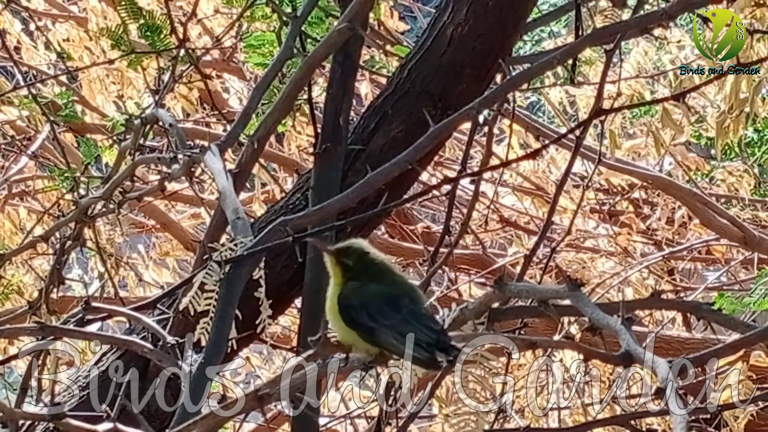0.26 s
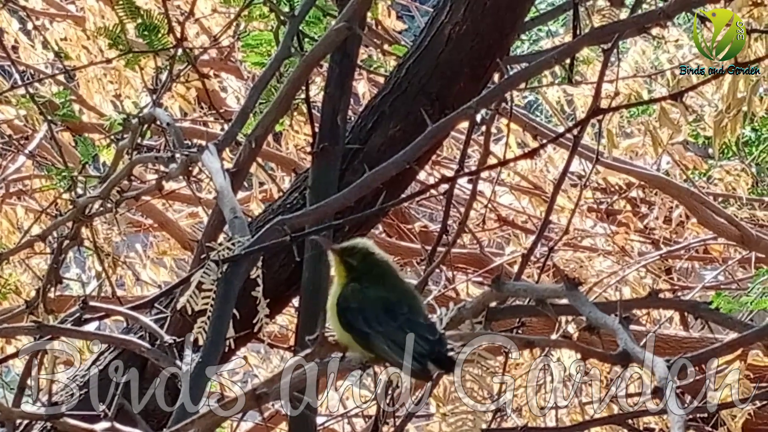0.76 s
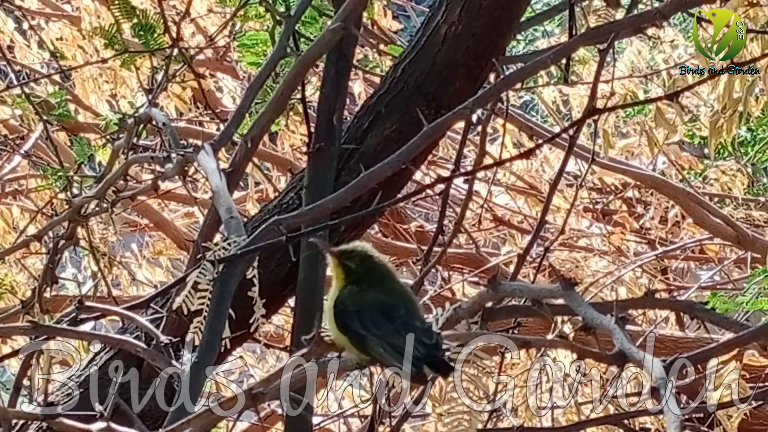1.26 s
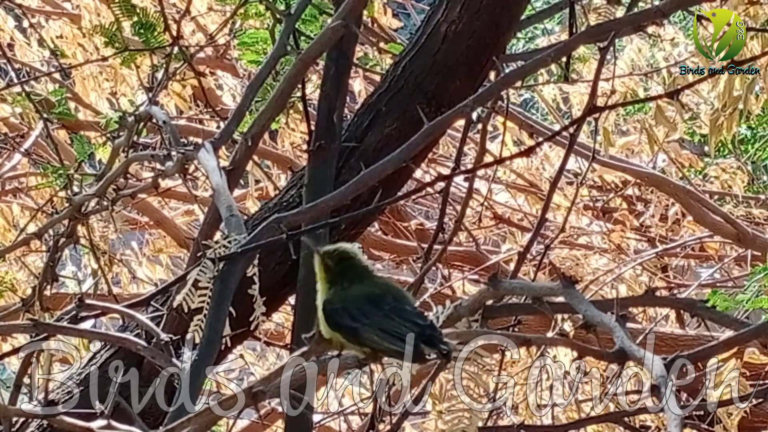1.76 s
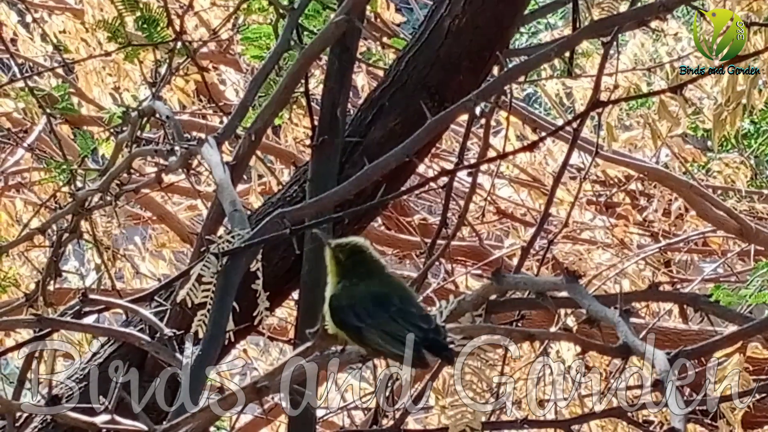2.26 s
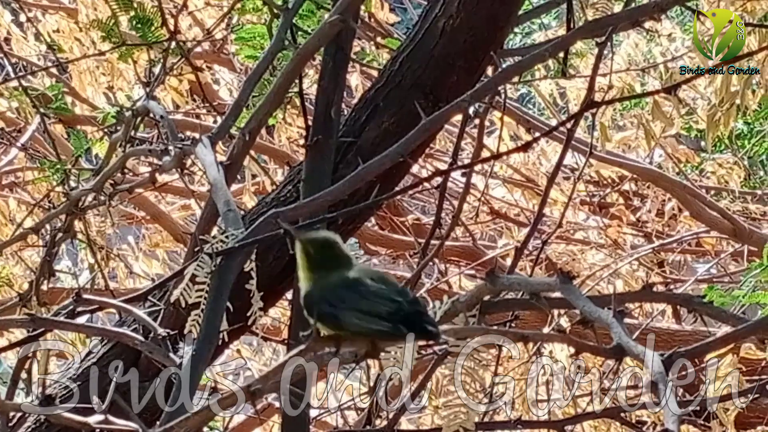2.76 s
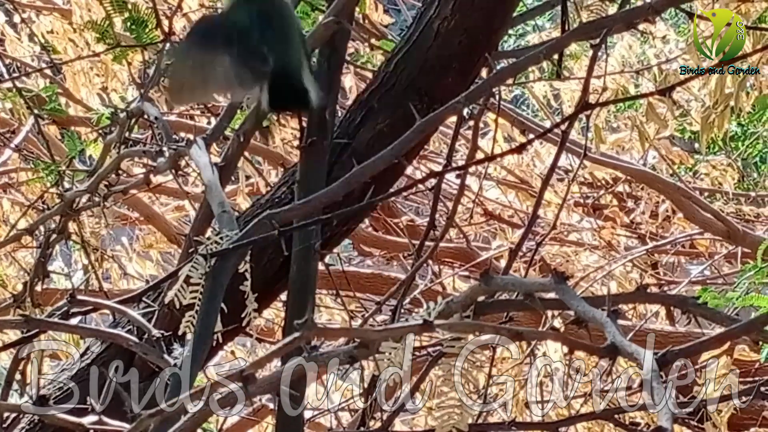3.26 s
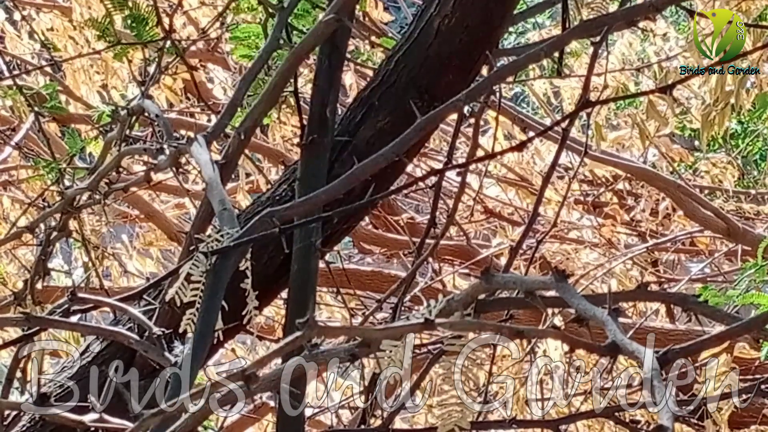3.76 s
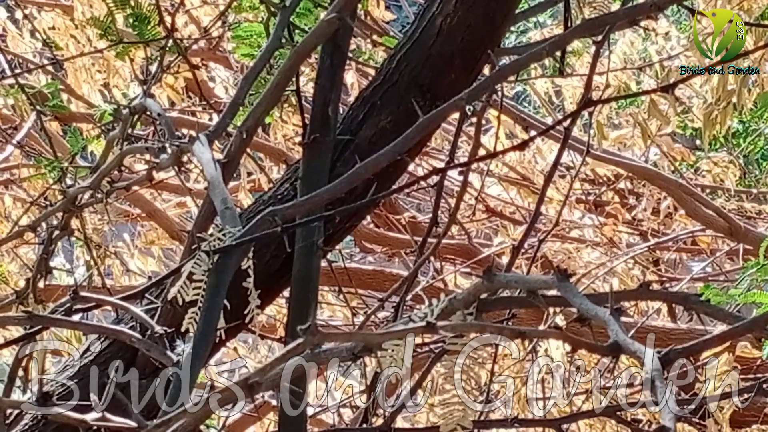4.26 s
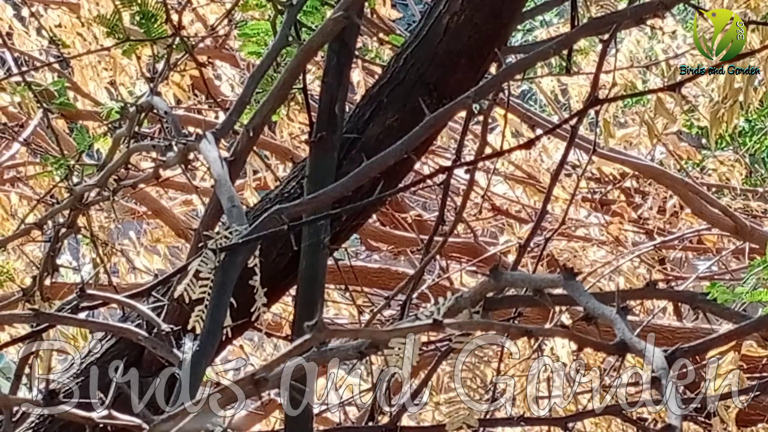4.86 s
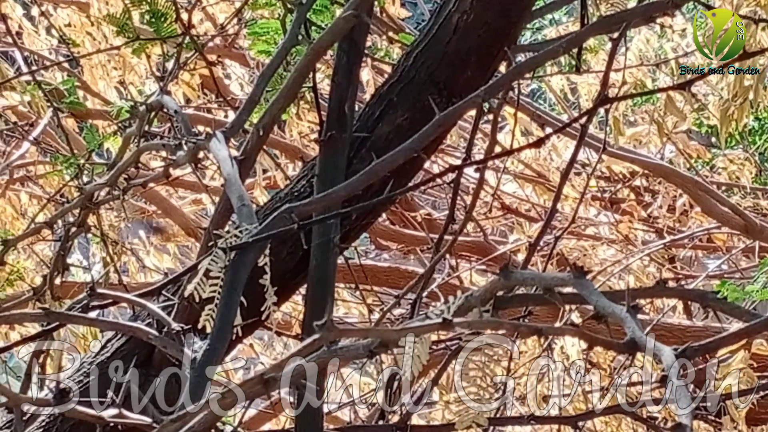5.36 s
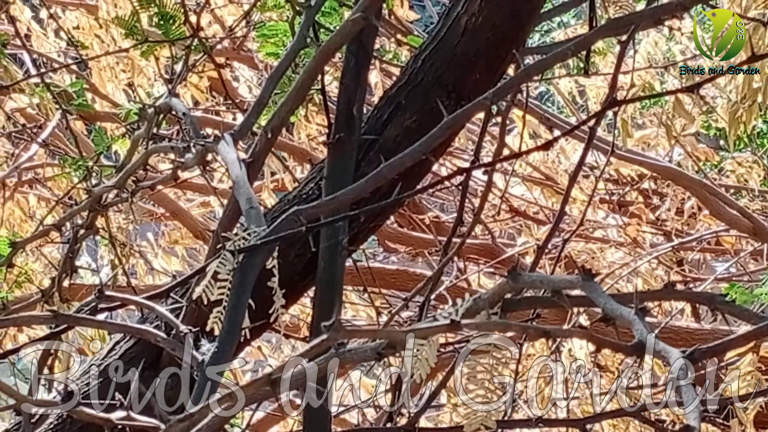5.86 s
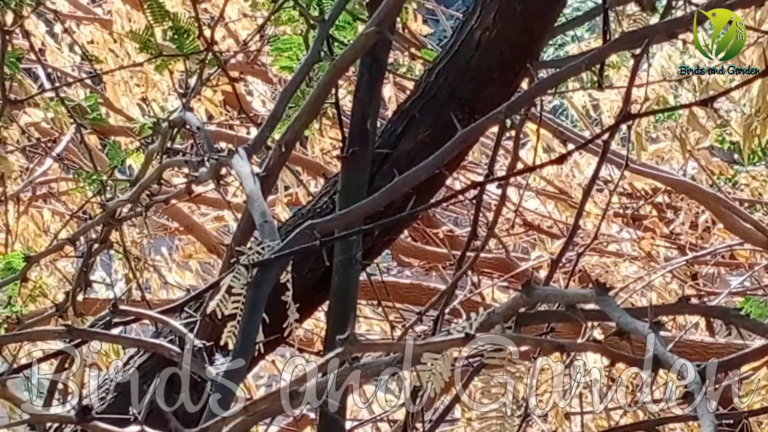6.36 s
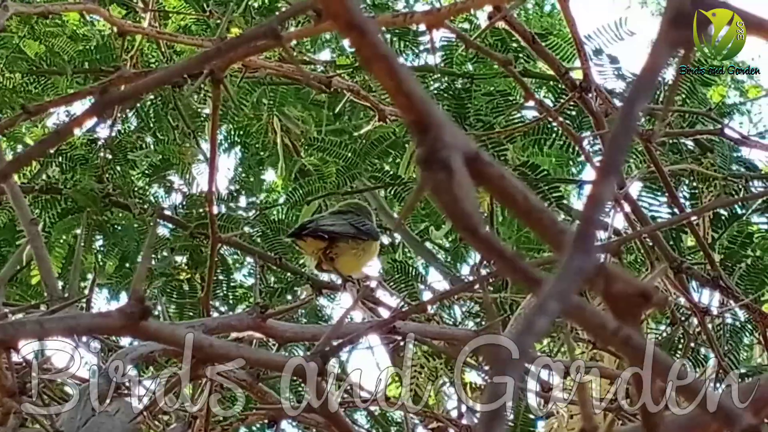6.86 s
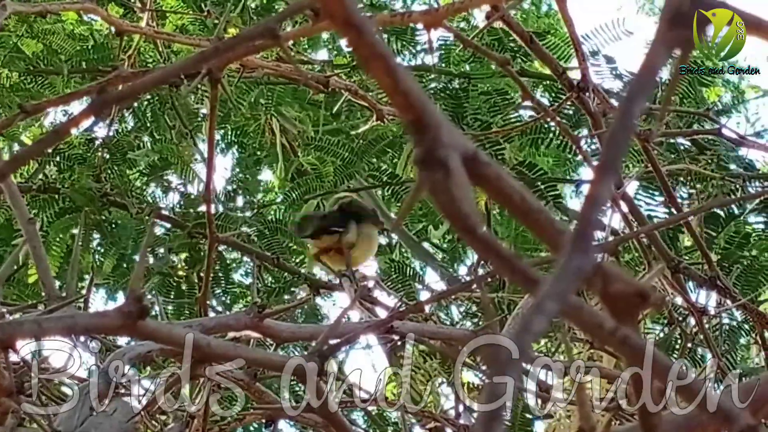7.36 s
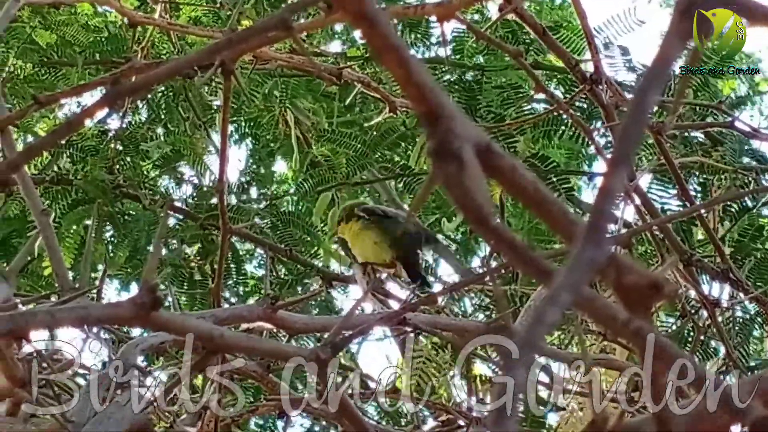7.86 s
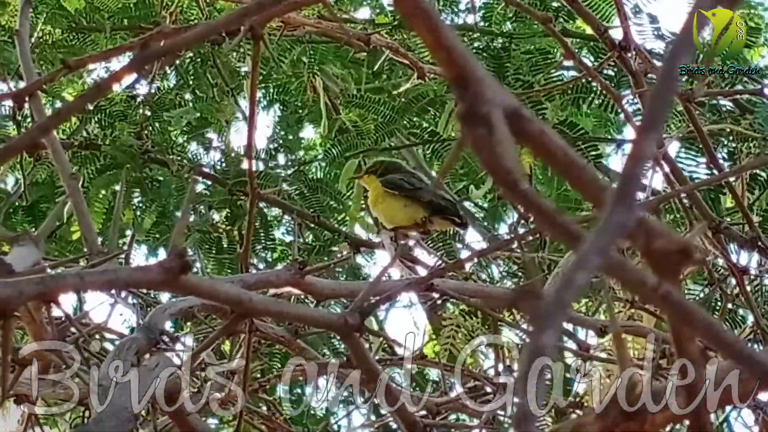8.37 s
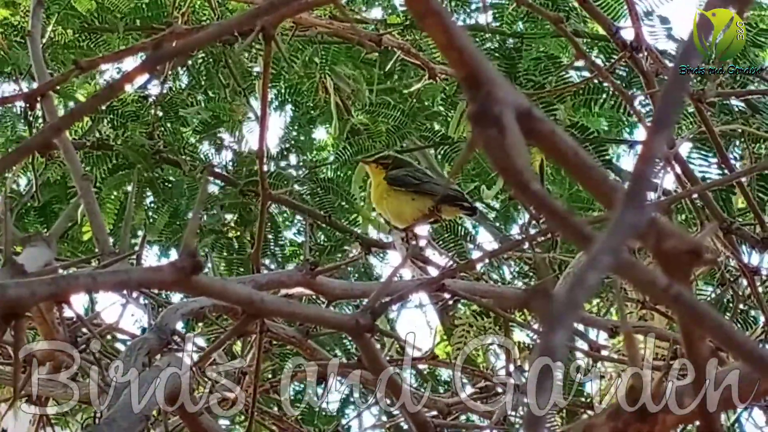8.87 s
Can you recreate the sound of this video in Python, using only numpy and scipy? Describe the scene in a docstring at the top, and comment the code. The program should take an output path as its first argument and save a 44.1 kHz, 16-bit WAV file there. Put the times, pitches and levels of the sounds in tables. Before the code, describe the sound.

Bright, piercing upswept bird calls about twice a second, soft wingbeats partway, other birds faint behind a low outdoor rumble, sound briefly cutting out.

```python
"""A sunbird in a thorn tree close to the microphone calls seventeen times: a rasp settles into a rising whistle.
From the start other birds twitter further away, as thin arched whistles over a low outdoor rumble and rush.
Between 2.4 and 3.7 s the sunbird flutters in puffs of noise and brushes the foliage; near 7 s all sound
drops out for 0.3 s; near 7.8 s it shuffles among the leaves. Faint echoes return; the sound is nearly mono."""
import sys
import numpy as np
from scipy import signal
from scipy.fft import rfft, irfft, next_fast_len
from scipy.io import wavfile
from scipy.ndimage import uniform_filter1d, minimum_filter1d, map_coordinates

SR = 44100
rng = np.random.default_rng(int(sys.argv[2]) if len(sys.argv) > 2 else 0)


def wrap_up_sound(samples):
    """Save the sound to the file named by the first command line argument, as 16-bit audio."""
    columns = np.atleast_2d(samples).T
    # keep every value between -1 and 1, then stretch to whole-number steps
    tamed = np.clip(columns, -1, 1)
    steps = np.round(tamed * 32767).astype(np.int16)
    wavfile.write(sys.argv[1], SR, steps)


N = 402191
TIME = np.arange(N) / SR
TOP_HZ = 15700  # upper limit of the whole sound
ATTACK_S, RELEASE_S = 0.009, 0.015  # fades of the whistle

# colour of the sunbird's rasp and breath: columns f/Hz, level/dB
RASP_COLOUR = [(1000, -53.5), (2000, -21.5), (2900, -21.5), (3400, -17), (4000, 1), (4900, 1), (5800, -3),
               (7000, -15.5), (9000, -27.5), (11000, -38), (14500, -41), (16000, -45.5)]
# colour of the outdoor rumble: columns f/Hz, level/dB per Hz
AIR_COLOUR = [(20, -35.5), (38, -14), (60, -3), (140, 0.5), (240, -2.5), (310, -9), (430, -11), (680, -19),
              (1100, -21.5), (2200, -26), (5000, -37.5), (7000, -38.5), (11000, -45.5), (15500, -53)]
AIR_DB = -42.5  # level of the rumble


def undb(db):
    """Decibels to gain."""
    return 10 ** (np.asarray(db) / 20)


def unit(x):
    """Scale to rms 1."""
    return x / np.sqrt(np.mean(x ** 2))


def gain_at(hz, points):
    """Gain of a (Hz, dB) spectrum at the given frequencies."""
    f, db = np.transpose(points)
    return undb(np.interp(np.log(hz + 1), np.log(f), db))


def noise(points, size):
    """Noise of rms 1 with a (Hz, dB) spectrum."""
    n = next_fast_len(size)
    spectrum = rfft(rng.standard_normal(n)) * gain_at(np.fft.rfftfreq(n, 1 / SR), points)
    return unit(irfft(spectrum, n)[:size])


def walk(rate, size):
    """Smooth random wander around 0, rate turns a second."""
    k = max(int(SR / rate), 1)
    steps = np.repeat(rng.standard_normal(size // k + 1), k)
    return 2.52 * uniform_filter1d(uniform_filter1d(steps, k), k)[:size]


def ramp(x):
    """Smooth step from 0 to 1 as x goes from 0 to 1."""
    return np.sin(np.pi / 2 * np.clip(x, 0, 1)) ** 2


def arch(length):
    """Progress 0-1 through a short sound, and its soft-edged envelope."""
    u = np.linspace(0, 1, int(length * SR))
    return u, ramp(4 * u) * ramp(4 * (1 - u))


def add(out, start, x):
    """Mix x into out from a start time."""
    i = max(int(start * SR), 0)
    out[i:i + len(x)] += x[:max(len(out) - i, 0)]


def sunbird(rasp_db=1, click_db=-42, click_lead_s=0.0068,
            closing_db=-33, closing_s=0.0094, closing_lead_s=0.006):
    """Each call: the beak clicks open, then the rasp, then the whistle, which breaks off in a short soft rasp."""
    # one row per call: start t/s, nominal rasp length/s, rasp level before rasp_db/dB, whistle length/s,
    # wait before the climb/s, climb time/s, shoulder f/Hz, creep after the shoulder/(Hz per s),
    # flick time/s, top f/Hz, whistle level/dB, crescendo/dB, hoarseness/0-1
    calls = [(0.157, 0.037, -25, 0.2, 0.027, 0.076, 1950, 8033, 0.014, 3480, -14.5, -1.2, 0.54),
             (0.688, 0.044, -25.0, 0.18, 0.023, 0.13, 2470, 0.0, 0.029, 2970, -13, -1.5, 0.2),
             (1.622, 0.041, -21, 0.19, 0.006, 0.076, 1945.0, 6720.0, 0.013, 3230, -12.5, -2.5, 0.23),
             (2.211, 0.048, -21.0, 0.14, 0.0013, 0.07, 1982.0, -2, 0.038, 2820.0, -11.1, -0.2, 0.45),
             (2.572, 0.045, -20.5, 0.2, 0.0098, 0.115, 2368.0, 1704, 0.019, 2810, -12.5, 0, 0.05),
             (3.124, 0.03, -19, 0.18, 0.016, 0.11, 2290, 3934, 0.035, 3350, -11.5, -1, 0.87),
             (3.708, 0.028, -22.5, 0.18, 0.012, 0.052, 1885.0, 7380.0, 0.013, 2740, -13, -3.0, 0.5),
             (4.198, 0.041, -23.0, 0.2, 0.024, 0.04, 1962, 270.0, 0.037, 2885, -12, -1, 0.54),
             (4.67, 0.046, -25.0, 0.18, 0.0079, 0.1, 2372, 3930.0, 0.014, 3470, -12.8, 1.5, 0.26),
             (5.124, 0.046, -20.5, 0.17, 0.0023, 0.037, 2000, 5380.0, 0.013, 3470, -11.5, 2, 0.25),
             (5.525, 0.041, -22.0, 0.2, 0.0043, 0.079, 1946.0, 3357, 0.032, 2885, -12.5, 2, 0.8),
             (5.954, 0.048, -23, 0.2074, 0.00029, 0.045, 1960, 4240.0, 0.015, 3100, -11.5, -0.2, 0.1),
             (6.402, 0.043, -22.0, 0.16, 0.03, 0.095, 2638, 12000.0, 0.019, 3310, -12.6, -2, 0.6),
             (7.504, 0.031, -26.5, 0.2, 0.014, 0.055, 1815, 7642, 0.011, 3060, -14.9, 0, 0.3),
             (7.973, 0.039, -26, 0.2, 0.0049, 0.055, 1964, 4612, 0.015, 3210, -16, -1.2, 0.15),
             (8.472, 0.033, -24.5, 0.18, 0.021, 0.059, 1944, 10430.0, 0.019, 3380, -13.5, 3, 0.65),
             (8.874, 0.043, -24.5, 0.19, 0.004, 0.16, 2385.0, 0.0, 0.013, 2680, -13.5, -1.5, 0.1)]
    out = np.zeros(N)
    for start, rasp_s, db, length, *shape, level_db, crescendo_db, hoarse in calls:
        _, click = arch(0.0026)
        _, closing = arch(closing_s)
        whistle_at = start + rasp_s
        add(out, start - click_lead_s, undb(click_db) * click * noise(RASP_COLOUR, len(click)))
        # the rasp starts early and runs on into the whistle
        add(out, start - 0.009, undb(db + rasp_db) * rasp(rasp_s + 0.00796))
        add(out, whistle_at - ATTACK_S, whistle(length, shape, level_db, crescendo_db, hoarse))
        closing_rasp = undb(closing_db) * closing * noise(RASP_COLOUR, len(closing))
        add(out, whistle_at + length - closing_lead_s, closing_rasp)
    return out


def rasp(length, attack_s=0.023, release_s=0.015, fall=0.3, grain_db=0.17,
         tone_hz=1650, tone_db=-2, tone_jitter=0.043):
    """The syrinx starts in chaotic vibration: a grainy burst sinks in colour while a shaky pitch emerges."""
    t = np.arange(int((length + release_s) * SR)) / SR
    # reading the noise ever more slowly lowers its colour
    speed = 1 + fall * (np.exp(-2 * t / length) - 0.4)
    chaos = map_coordinates(noise(RASP_COLOUR, size=2 * len(t)), [np.cumsum(speed)], order=3)
    shaky_hz = tone_hz * (1 + tone_jitter * walk(900, len(t)))
    phase = 2 * np.pi * np.cumsum(shaky_hz) / SR
    tone = unit(sum(gain_at(k * tone_hz, RASP_COLOUR) * np.sin(k * phase) for k in range(1, 6)))
    voice = unit(chaos + undb(tone_db) * ramp(t / length) * tone)
    grain = unit(undb(grain_db * walk(600, len(t))))
    return voice * grain * ramp(t / attack_s) * ramp((t[-1] - t) / (2 * release_s))


def whistle(length, shape, level_db, crescendo_db, hoarse, flutter_db=0.56, dip_db=6,
            jitter=0.0022, hoarse_jitter=0.015, rough_jitter=0.03, settle_s=0.017,
            unsteady_hz=3200, unsteady_width_hz=800, hiss_db=-39, hoarse_hiss_db=10,
            overtone_flicker_db=2.0, blur=0.067, waver=0.005, waver_rate=55):
    """Harmonics glide up through the throat resonance, so the third harmonic leads first, then the second."""
    # strength of harmonics 1 to 8 at the syrinx: column level/dB
    harmonic_levels = [6, 7.5, -2.5, -9, -9.5, -15, -13.5, -23]
    # windpipe and beak, one main resonance near 4.7 kHz: columns f/Hz, level/dB
    throat = [(1600, -36.5), (2450, -34), (3150, -23.5), (3750, -7), (4250, 2), (4800, 2), (5600, -1.5),
              (6350, -8.5), (7100, -19), (9200, -17.5), (11500, -31.5), (13200, -21.5), (15600, -34)]
    # loudness by pitch, greatest while the second harmonic sits in the resonance: columns f/Hz, level/dB
    pitch_loudness = [(1610, -9.5), (1700, -11.5), (1900, -9), (2100, -4), (2350, 0.5), (2750, 1),
                      (3000, -5.5), (3300, -12.5), (3500, -23)]
    t = np.arange(-ATTACK_S, length + RELEASE_S, 1 / SR)
    # the pitch wanders off its smooth path
    hz = glide(t, length, *shape) * (1 + waver * walk(waver_rate, len(t)))

    # the level flutters a little, and may dip briefly towards the end of the call
    dips = ramp(walk(260, len(t)) / 2) * ramp(3 * (t / length - 0.6))
    flutter = flutter_db * walk(220, len(t)) - dip_db * dips
    swell = crescendo_db * (t / length - 0.5)
    loudness = gain_at(hz, pitch_loudness) * undb(level_db + swell + flutter)

    # the vibration is unsteady as it leaves the rasp, and again at high pitch
    rough = np.exp(-(t - t[0]) / settle_s) + ramp((hz - unsteady_hz) / unsteady_width_hz + 0.5)
    # a hoarse call trembles more and more as the pitch climbs
    strain = hoarse * ramp((hz - 2100) / 700)
    tremble = (jitter + hoarse_jitter * strain) * walk(600, len(t))
    hz = hz * (1 + tremble + rough_jitter * rough * walk(1800, len(t)))
    phase = 2 * np.pi * np.cumsum(hz) / SR

    tone, power = 0, 0
    for k, db in enumerate(harmonic_levels, 1):
        below_top = ramp((TOP_HZ - k * hz) / 500 + 1)
        gain = undb(db) * gain_at(k * hz, throat) * below_top
        # weak overtones flicker in level and phase
        loose = np.clip(1 - 2 * gain, 0, 1)
        gain = gain * undb(loose * overtone_flicker_db * walk(198.9, len(t)))
        tone = tone + gain * np.sin(k * phase + loose * blur * walk(1500, len(t)))
        power = power + gain ** 2 / 2
    hiss = undb(hiss_db + hoarse_hiss_db * strain) * noise(RASP_COLOUR, len(t))
    voice = tone / np.sqrt(power) + hiss
    return voice * loudness * ramp((t - t[0]) / ATTACK_S) * ramp((t[-1] - t) / RELEASE_S)


def glide(t, length, wait, climb, shoulder_hz, creep_hz_per_s, flick_s, top_hz,
          low_hz=1617, break_hz=3507, break_s=0.007):
    """Pitch of a whistle: it waits low, climbs to a shoulder, creeps on, is flicked to its top and breaks."""
    hz = low_hz + (shoulder_hz - low_hz) * np.sin(np.pi / 2 * np.clip((t - wait) / climb, 0, 1))
    hz = hz + creep_hz_per_s * np.maximum(t - wait - climb, 0)
    hz = hz + (top_hz - hz) * np.exp(-(np.minimum(t - length, 0) / flick_s) ** 2)
    # as it is cut off, every whistle moves towards the same break pitch
    return hz + (break_hz - hz) * (1 - np.exp(-np.maximum(t - length, 0) / break_s))


def wings(beat_hz=32.4, beat_db=2.0, pass_s=3.39, pass_length_s=0.13, pass_hz=115, pass_db=-37):
    """Every wingbeat pushes a soft puff of air; feathers scratch along the foliage."""
    # bursts of wingbeats: columns start t/s, length/s, level/dB
    flutters = [(2.406, 0.17, -41), (3.126, 0.21, -35.5), (3.324, 0.29, -38.5), (3.571, 0.15, -43)]
    # feathers brushing twigs and leaves: columns start t/s, length/s, centre f/Hz, level/dB
    brushes = [(3.357, 0.24, 4550, -50), (3.575, 0.06, 4840, -41.5), (3.631, 0.063, 4840, -38.5),
               (7.799, 0.037, 2440, -43.5), (7.789, 0.043, 3850, -38), (7.878, 0.034, 3270, -42.5)]
    out = np.zeros(N)
    puff = [(40, -22), (115, -2.0), (230, -1.0), (320, -13.0), (420, 1.5), (640, -19.5),
            (1200, -26.0), (4000, -43.5), (12000, -70)]  # f/Hz, level/dB
    for start, length, db in flutters:
        u, envelope = arch(length)
        beats = undb(beat_db * np.cos(2 * np.pi * beat_hz * length * u))
        add(out, start, undb(db) * envelope * unit(beats * noise(puff, len(u))))
    # a low whirr as the bird passes closest
    u, envelope = arch(pass_length_s)
    whirr = unit(np.sin(2 * np.pi * pass_hz * pass_length_s * u))
    add(out, pass_s, undb(pass_db) * envelope * whirr)
    for start, length, hz, db in brushes:
        u, envelope = arch(length)
        colour = [(hz / 5, -30), (hz * 0.66, -3), (hz, 0), (hz * 1.53, -8), (hz * 2, -25), (hz * 4, -48)]
        scratch = noise(colour, len(u)) * undb(0.9 * walk(330, len(u)))
        add(out, start, undb(db) * envelope * unit(scratch))
    return out


def other_birds(waver=0.016, chatter_db=-61, chatter_hz=3350, count=210):
    """Thin arched whistles from further off, amid a running chatter of fainter ones."""
    # loudest notes: columns start t/s, length/s, start f/Hz, middle f/Hz, end f/Hz, mean level/dB
    twitter = [ (.95, 0.15, 4300, 2690, 2230, -53), (1.129, 0.073, 3200, 4240, 3570, -50.5),
               (1.281, 0.077, 3700, 3980, 3800, -51), (2.01, 0.086, 2814, 2230, 2200, -52.5),
               (2.126, 0.051, 5100, 5700, 6150, -50), (2.154, 0.11, 2900, 3830, 3450, -46),
               (4.508, 0.07, 4600, 3800, 2890, -39), (5.4, 0.048, 2500, 3140, 2800, -49),
               (6.78, 0.02, 3900, 3180, 2590, -46.5), (6.869, 0.053, 3560, 3010, 2360, -41),
               (7.359, 0.062, 4400, 6180, 3900, -48), (7.433, 0.066, 3650, 4830, 3600, -42.5),
               (7.654, 0.11, 4525, 3660, 3260, -32), (8.245, 0.032, 4900, 3920, 3140, -42),
               (8.356, 0.05, 3920, 3170, 2730, -52.5), (9.017, 0.042, 4130, 3550, 3050, -42)]
    out = np.zeros(N)
    chatter = []
    for at, long, height, loud, *bend in rng.random((count, 7)):
        octaves = 0.63 * (height - 0.5) + 1.2 * (np.array(bend) - 0.5)
        pitches = chatter_hz * 2 ** octaves
        chatter.append((at * N / SR, 0.0338 + 0.036 * long, *pitches, chatter_db + 4 * loud))
    for start, length, first, middle, last, db in list(twitter) + chatter:
        u, envelope = arch(length)
        curve = np.polyfit([0, 0.5, 1], [first, middle, last], 2)
        hz = np.polyval(curve, u) * (1 + waver * walk(700, len(u)))
        note = unit(np.sin(2 * np.pi * np.cumsum(hz) / SR))
        add(out, start, undb(db + 2 * walk(120, len(u))) * envelope * note)
    return out


def garden(x, tail_db=-29, t60_s=0.41, twigs_db=-21, twigs_t60_s=0.092, ground_db=-19, ground_s=0.0082,
           echo_db=-32, echo_s=0.0817, echo_spread_s=0.02):
    """A bounce off the ground, quick scatter from the twigs, a smeared echo from further off, and a thin tail."""
    t = TIME[:int(0.6 * SR)]
    # air and leaves take the treble: f/Hz, level/dB
    far = [(500, -4.5), (3000, -7.0), (5300, -2.0), (7000, -8), (14000, -24.5)]
    # relative levels: all three are halved below
    parts = [(twigs_db, undb(-60 * t / twigs_t60_s)),
             (tail_db, undb(-60 * t / t60_s)),
             (echo_db, np.exp(-((t - echo_s) / echo_spread_s) ** 2))]
    response = sum(undb(db) * unit(envelope * noise(far, len(t))) for db, envelope in parts)
    response = response / np.sqrt(len(t))
    # the bounce off the ground beats against fast glides and makes them ripple
    bounce = undb(ground_db) * np.pad(x, (int(ground_s * SR), 0))[:N]
    return signal.fftconvolve(x, response / 2)[:N] + bounce


def outdoors(rush_db=-57, leaves_db=-61.0):
    """Low rumble, a distant rush that swells, and a flickering haze of far birds and leaves, all shaped noise."""
    # level of the distant rush relative to rush_db: columns t/s, level/dB
    rush_swell = [(0, -2), (2, -2), (4.35, 10.5), (4.8, 7), (5.7, 5), (6.25, 10.5), (6.9, 6.5), (7.4, -5.5),
                  (9.1, 1)]
    swell_db = np.interp(TIME, *np.transpose(rush_swell))
    rumble = noise(AIR_COLOUR, N) * undb(AIR_DB + walk(7, N) / 2)
    rush = noise([(200, -21), (410, 12.0), (540, 1), (760, -9), (1130, 1.5), (1600, -11),
                  (4000, -32.0), (12000, -46.5)], N)
    haze = noise([(1500, -40.5), (3200, 2), (4300, 7), (5800, 1), (7500, -30.0), (14000, -40.5)], N)
    return rumble + rush * undb(rush_db + swell_db) + haze * undb(leaves_db + 2.76 * walk(25, N))


def scene(far_wet_db=10.0):
    """The near bird is almost dry, the far ones wetter; both channels hear the same."""
    near = sunbird() + wings()
    far = other_birds()
    mix = near + far + garden(near + undb(far_wet_db) * far) + outdoors()
    return np.array([mix, mix])


def limit(x, top=0.53, size=130):
    """Limiter: the gain falls for a few milliseconds (size in samples) around any peak above the top."""
    gain = top / np.maximum(np.abs(x).max(axis=0), top)
    return x * uniform_filter1d(minimum_filter1d(gain, size), size)


def record(dry, ceiling=0.34, side_db=-31, side_floor_db=-26):
    """Limited peaks clip and gain a glint near 14 kHz; then a little width, a moment of silence and a cut top."""
    # clip at four times the sample rate to keep aliasing down
    fine = signal.resample_poly(limit(dry), 4, 1, axis=1)
    clipped = signal.resample_poly(np.clip(fine, -ceiling, ceiling), 1, 4, axis=1)
    # a quarter-cycle shift widens the image slightly and leaves the balance centred
    shifted = signal.hilbert(clipped[0], next_fast_len(N))[:N].imag
    side = undb(side_db) * shifted + undb(AIR_DB + side_floor_db) * noise(AIR_COLOUR, N)
    # the silent moment: start t/s, end t/s
    silent_span = (6.977, 7.27)
    live = (TIME < silent_span[0]) | (TIME > silent_span[1])
    stereo = (clipped + np.array([side, -side])) * live
    top_cut = signal.ellip(10, 0.1, 80, TOP_HZ, fs=SR, output="sos")
    return signal.sosfilt(top_cut, stereo)


dry = scene()
out = record(dry)
wrap_up_sound(out)
```